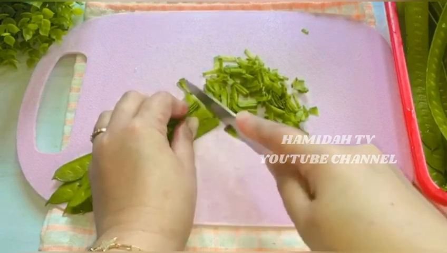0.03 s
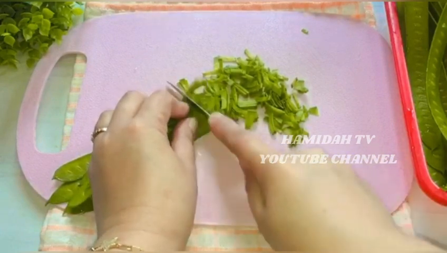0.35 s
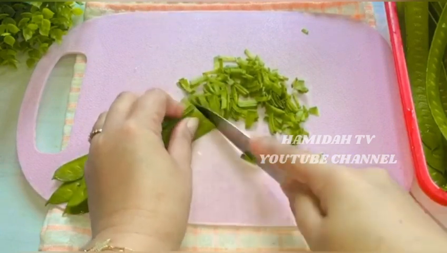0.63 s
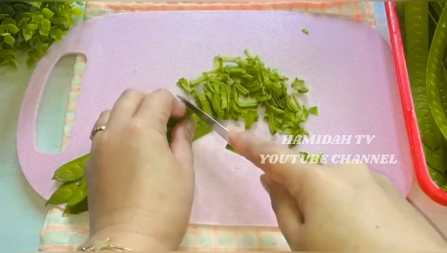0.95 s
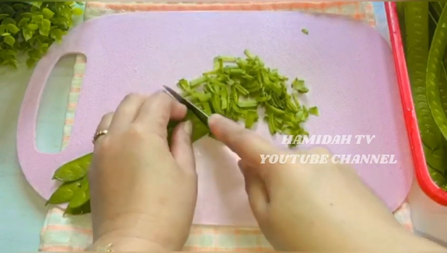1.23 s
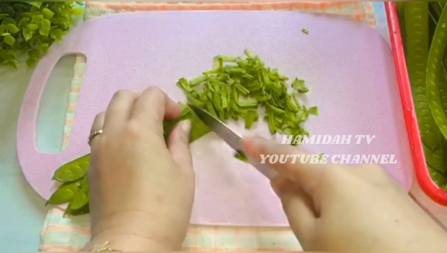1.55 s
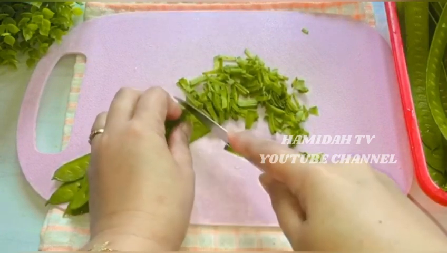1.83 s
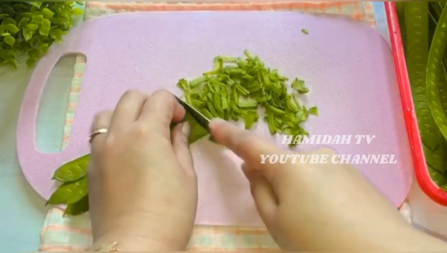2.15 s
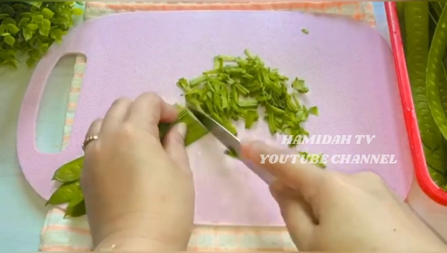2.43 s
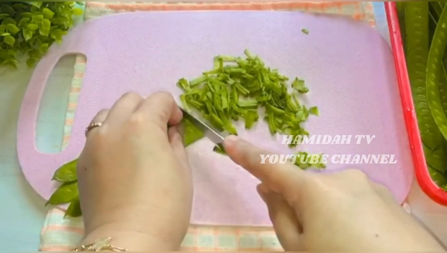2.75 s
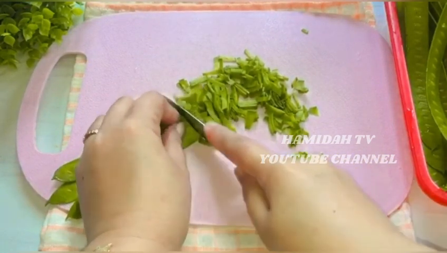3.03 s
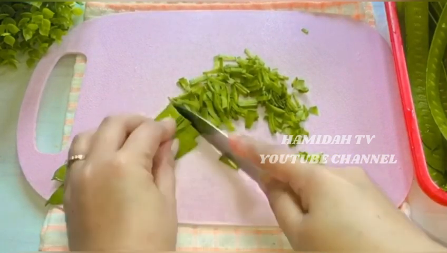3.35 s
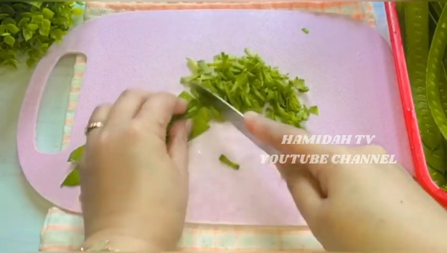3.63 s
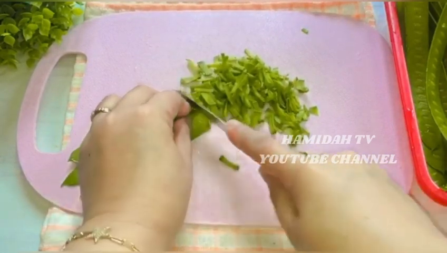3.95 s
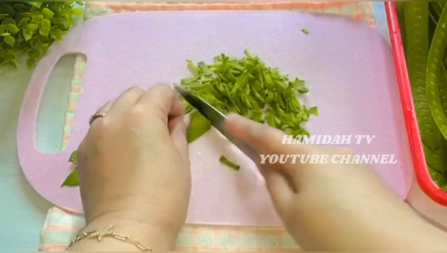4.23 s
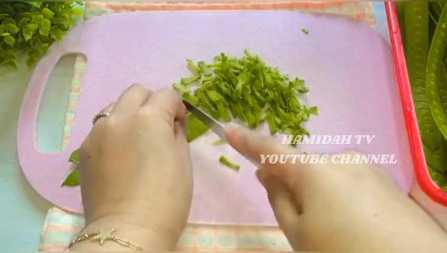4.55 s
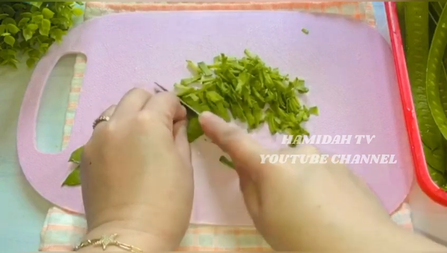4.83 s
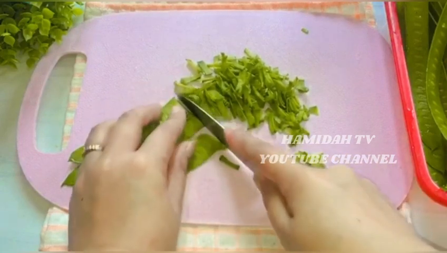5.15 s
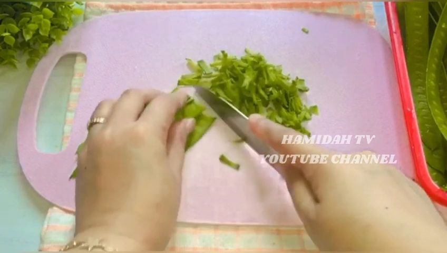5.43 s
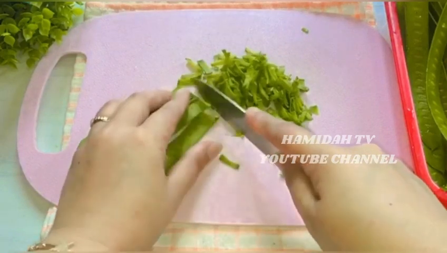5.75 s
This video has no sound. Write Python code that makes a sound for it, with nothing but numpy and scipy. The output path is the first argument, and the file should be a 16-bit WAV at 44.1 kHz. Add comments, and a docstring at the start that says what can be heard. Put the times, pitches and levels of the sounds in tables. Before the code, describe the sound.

Close to the microphone, a kitchen knife slices crisp green pods on a plastic cutting board. Six uneven strokes come about a second apart, each a snap and brief crunch ending in a hard knock and a soft rustle. Between and after them, the blade taps lightly or scrapes the slices aside. The hard-walled room rings briefly, and a distant engine drones low through the walls.

```python
"""A hard-walled room, the microphone close to a plastic cutting board. A kitchen knife slices crisp
green pods in six uneven strokes: the skin snaps, the flesh tears, the blade knocks on the board and
a soft, grainy swell follows. Now and then the edge taps the board or scrapes the slices aside.
Far off, through the walls, an engine drones and changes speed over a dull rumble.
The recorder's limiter ducks at each knock and lets the room swell back."""
import sys
import numpy as np
from scipy import signal
from scipy.fft import rfft, irfft
from scipy.io import wavfile
from scipy.ndimage import uniform_filter1d

SR = 44100
rng = np.random.default_rng(int(sys.argv[2]) if len(sys.argv) > 2 else 0)


def pcm_store(signal):
    """Save signal as 16-bit PCM."""
    levels = np.round(np.clip(np.atleast_2d(signal), -1, 1) * 32767)
    wavfile.write(sys.argv[1], SR, levels.astype(np.int16).T)


N = 264600

# Levels are relative within a table; each source adds its own gain.
# the distant engine's course: time_s, firing_hz, fundamental_db
ENGINE_COURSE = [(0.0, 77.1, -18.5), (0.2, 80.5, -27), (0.28, 82, -14.5), (0.47, 82.4, -22),
                 (0.55, 80.8, -45.5), (1.0, 67.35, -15), (1.1, 63.3, -8), (1.25, 59.06, -18),
                 (1.52, 49.9, -28.5), (1.84, 45.35, -33.5), (2.22, 45.4, -25), (2.61, 45.36, -27.5),
                 (2.77, 46.9, -24), (3.41, 43.98, -27), (3.66, 42.57, -37.5), (4.24, 40.0, -33.5),
                 (4.61, 39.34, -49), (4.9, 51.64, -41.5), (5.41, 51.3, -36.5), (5.65, 71.9, -43),
                 (5.88, 78.4, -32.5), (6.0, 77.9, -42)]
# steady room tone: frequency_hz, density_db
ROOM_TONE = [(20, -27), (45, 1), (100, -7), (170, -1), (260, -15), (400, -22), (900, -30), (2000, -33),
             (5000, -39.5), (11000, -45)]
# light touches of the edge on the board: start_s, level_db, treble_db
LIGHT_TAPS = [(0.2497,-25,2), (0.705,-20.5,-5), (1.5715,-12,1.5), (2.8351,-17.5,6), (3.9314,-29.5,-2),
              (3.971,-21.5,-4), (4.659,-28.5,-1), (5.310,-17,-1), (5.5235,-17.5,-2)]
# cuts through a pod: enters_s, snap_db, creep_db, gives_way_s, crack_db, crunch_db, swell_db
POD_CUTS = [(0.2731, -16, -28.5, 0.326, -7.5, -19, -33), (1.0954, -12, -35, 1.1745, -6.5, -19, -32),
            (1.961, -12.5, -31, 2.002, -20.5, -17, -33), (2.864, -16.5, -31, 2.9565, -10.5, -17.5, -34),
            (3.9987, -14.5, -28.5, 4.071, -16.5, -18.5, -44), (4.6799, -15, -32, 4.7445, -11, -18, -32.5)]
# tough strings and strips of skin breaking: start_s, level_db, treble_db
STRING_BREAKS = [(0.351, -6.5, 0), (1.0802, -24, 10), (1.178, -2.5, 12), (1.389, -24, 16), (2.0008, -14, 5),
                 (2.0314, -9.5, 0), (2.9242, -9.5, 18), (2.9423, -12, 5), (4.092, -7, -6),
                 (4.7533, -8.5, 7), (4.7927, -5, -3)]
# the edge landing after each cut: start_s, length_s, tip_db, treble_db, heel_delay_s, heel_db
BOARD_KNOCKS = [(0.363, 0.008, -2, 2.5, .016, -0.5), (1.207, .0052, 1.5, 7.5, .022, -4.5),
                (2.051, 0.0079, -5, 2.5, .015, 3), (2.98, 0.0079, 4, 2, .014, 6.5),
                (4.135, 0.0032, 2.5, 1.5, .0045, -1), (4.809, .0033, 3.5, -12, 0.0057, 4.5)]
# pods shifted on the board: start_s, length_s, level_db, treble_db
POD_SHIFTS = [(1.933,0.013,-36.5,1), (2.439,0.044,-50,-16), (3.894,0.1,-48,12), (5.159,0.079,-41.5,-2),
              (5.842,0.017,-37,1.5), (5.97,0.036,-35.5,10)]
# the edge sliding over the board: start_s, length_s, level_db, treble_db
BLADE_SCRAPES = [(3.419, .046, -14.5, 6.5), (3.488, 0.049, -18, -7.5), (4.396, 0.0078, -11.5, 10.5),
                 (5.307, 0.088, -19, 0.5), (5.434, 0.033, -22, -8)]
# colour of each kind of sound, heard close up: frequency_hz, density_db
TAP_COLOUR = [(100, -20), (400, 0), (1050, 0.5), (1800, -6.5), (2500, -14.5), (4000, -15), (6000, -20),
              (12000, -23.5)]
SKIN_COLOUR = [(100, -24.5), (300, 0.5), (900, 1.5), (1900, -12), (2400, -7.5), (3300, -15.5),
               (5500, -13.5), (9500, -12), (12000, -23.5)]
FLESH_COLOUR = [(100, -24), (250, 0), (900, -1), (1900, -8.5), (2400, -8.5), (3300, -6.5), (4500, -8),
                (9500, -9.5), (12000, -19)]
KNOCK_COLOUR = [(60, -30.5), (130, -16.5), (220, -4.5), (500, -2), (800, -1), (1300, -7), (3000, -13),
                (5000, -15.5), (9500, -20.5), (12000, -29.5)]
SWELL_COLOUR = [(100, -15), (350, -5), (650, 0.5), (1300, -3.5), (2400, -11), (4500, -11), (9000, -19),
                (12000, -25.5)]
SCRAPE_COLOUR = [(100, -18.5), (350, 2.5), (900, 0.5), (1600, -4.5), (2000, -14), (2500, -8), (5000, -20),
                 (9500, -25.5), (12000, -32)]
# board ringing with every contact: pitch_hz, width_hz, level_db
BOARD_MODES = [(249, 103, -4.5), (525, 18, -7.5), (752, 39, -3), (946.6, 21, -1), (1064, 100, -3),
               (1550, 96, 0.5), (1717, 55, -0.5), (2346, 67, 3), (2910, 12, -14), (4230, 240, -6.5)]
# ring of the free blade, the flexing board and the room's low modes: pitch_hz, level_db, t60_s
STEEL_MODES = [(2100, -6, .6), (2300, -2, 0.36), (2464, -4, 0.27), (2600, -1, 0.26), (2740, -9, .35)]
FLEX_MODES = [(157, -11, 0.076), (230, -2.5, 0.086), (328, -2, 0.047), (447, -3, 0.035)]
WALL_MODES = [(498, -14.5, 0.42), (554, -7.5, 0.64), (612, -4.5, 0.56), (655, -4, 0.37), (759, -13.5, 0.12)]
# the room's diffuse tail: frequency_hz, level_db, t60_s
ROOM_TAIL = [(120, -4, 0.65), (373, -11.5, 0.48), (568, -3, 0.76), (990, -7, 0.68), (1790, -8, 0.82),
             (2760, -6, 0.77), (4950, -8, 0.75), (10100, -7, 0.57)]

SWELL_AFTER_S = 0.145  # from a knock to the start of its swell


def from_db(db):
    """Decibels to amplitude."""
    return 10 ** (np.asarray(db) / 20)


def rms_one(x):
    """Scale to an rms of 1."""
    return x / np.sqrt(np.mean(x ** 2) + 1e-20)


def at_hz(points, hz):
    """Read a curve along a log-frequency axis."""
    frequencies, values = np.transpose(points)
    return np.interp(np.log(hz + 1e-9), np.log(frequencies), values)


def drift(per_s):
    """A smooth wander between random values of spread 1."""
    knots = rng.standard_normal(int(per_s * N / SR) + 2)
    return np.interp(np.arange(N) * per_s / SR, np.arange(len(knots)), knots)


def resonate(x, hz, radius):
    """One resonance; the nearer the pole radius is to 1, the longer it rings."""
    poles = [1, -2 * radius * np.cos(2 * np.pi * hz / SR), radius ** 2]
    return (1 - radius ** 2) / 2 * signal.lfilter([1, 0, -1], poles, x)


def rings(x, modes):
    """Narrow resonances that go on sounding after each contact."""
    return sum(from_db(db) * resonate(x, hz, from_db(-60 / (t60 * SR))) for hz, db, t60 in modes)


def on_board(colour, ring_db, size=2048):
    """Response to one click: the contact's own colour plus the ringing of the board."""
    cepstrum = irfft(np.log(from_db(at_hz(colour, np.fft.rfftfreq(size, 1 / SR)))))
    cepstrum[1:size // 2] *= 2  # minimum phase: nothing sounds before the click
    cepstrum[size // 2 + 1:] = 0
    click = irfft(np.exp(rfft(cepstrum)))
    return click + sum(from_db(db + ring_db) * resonate(click, hz, np.exp(-np.pi * width / SR))
                       for hz, width, db in BOARD_MODES)


def contacts(rows, body, per_s, spread_db, rise_s, fade_s, split_hz=3000):
    """Bursts of tiny clicks sounding through a body. Rows: start_s, length_s, level_db, treble_db."""
    out = np.zeros(N)
    for start_s, length_s, db, treble_db in rows:
        t = np.arange(int((length_s + 6 * fade_s) * SR)) / SR
        fires = rng.random(len(t)) < per_s / SR
        size = np.minimum(rng.exponential(1, len(t)), 3)
        envelope = (1 - np.exp(-t / rise_s)) * np.exp(-np.maximum(t - length_s, 0) / fade_s)
        clicks = fires * from_db(spread_db * size) * rng.choice([-1, 1], len(t)) * envelope
        dull = signal.lfilter(*signal.butter(1, split_hz, fs=SR), clicks)
        burst = signal.fftconvolve(dull + from_db(treble_db) * (clicks - dull), body)
        burst *= np.sqrt((length_s + fade_s / 2) * SR / (np.sum(burst ** 2) + 1e-20))  # rms near 1
        start = int(start_s * SR)
        out[start:start + len(burst)] += from_db(db) * burst[:N - start]
    return out


def distant_engine(fade_db_per_s=5):
    """Only the lowest firing orders come through the walls; the overtones waver more and slowly fade."""
    t = np.arange(N) / SR
    times, *columns = np.transpose(ENGINE_COURSE)
    firing_hz, level_db = [np.interp(t, times, column) for column in columns]
    phase = 2 * np.pi * np.cumsum(firing_hz) / SR
    fade_db = fade_db_per_s * t
    fundamental = from_db(level_db + 1.3 * drift(13)) * np.sin(phase + 0.45 * drift(12))
    second = from_db(-30 - fade_db + 5.3 * drift(21.96)) * np.sin(2 * phase + 1.2 * drift(25))
    third = from_db(-41 - fade_db + 3.7 * drift(21.56)) * np.sin(3 * phase + 2.05 * drift(40))
    return np.sqrt(2) * (fundamental + second + third)


def room_tone(level_db=-39, low_cut_hz=33):
    """Dull rumble of the surroundings with a faint hiss."""
    colour = from_db(at_hz(ROOM_TONE, np.fft.rfftfreq(N, 1 / SR)))
    noise = irfft(rfft(rng.standard_normal(N)) * colour, N)
    low_cut = signal.butter(4, low_cut_hz, "high", fs=SR, output="sos")
    return from_db(level_db) * rms_one(signal.sosfilt(low_cut, noise))


def blade_taps(tap_s=0.0019):
    """The edge touches the plastic lightly; not pressed down, the steel is free to ring on."""
    rows = [(s, tap_s, db, treble) for s, db, treble in LIGHT_TAPS]
    body = on_board(TAP_COLOUR, ring_db=-1.5)
    taps = contacts(rows, body, per_s=6000, spread_db=3.5, rise_s=0.00058, fade_s=0.0025)
    return from_db(-2.5) * taps + from_db(9.5) * rings(taps, STEEL_MODES)


def room_reverb(x, build_s=0.0029, bands=16):
    """Reflections off the hard walls build up and die away band by band; the low modes ring along."""
    t, tail = np.arange(SR) / SR, 0
    table, edges = np.array(ROOM_TAIL), np.geomspace(90, 14000, bands + 1)
    for low, high in zip(edges, edges[1:]):
        hz = np.sqrt(low * high)
        level_db, t60_s = at_hz(table[:, :2], hz), at_hz(table[:, [0, 2]], hz)
        envelope = from_db(-60 * t / t60_s) * (1 - np.exp(-t / build_s))
        band_pass = signal.butter(2, [low, high], "band", fs=SR, output="sos")
        band = signal.sosfilt(band_pass, rng.standard_normal(SR))
        tail += from_db(level_db) * rms_one(band * envelope) * np.sqrt(2 * (high - low)) / SR
    return from_db(-5.5) * signal.fftconvolve(x, tail)[:N] + from_db(5.5) * rings(x, WALL_MODES)


def snaps(breaks, snap_s=0.0013):
    """Single sharp cracks in the colour of taut skin. Rows: start_s, level_db, treble_db."""
    rows = [(s, snap_s, db, treble) for s, db, treble in breaks]
    body = on_board(SKIN_COLOUR, ring_db=-0.5)
    return from_db(0.85) * contacts(rows, body, per_s=12000, spread_db=2.5, rise_s=0.0011, fade_s=0.0015)


def skin_breaks(again_s=0.0097, softer_db=4.5, treble_db=3):
    """Rows for snaps(): the skin breaks twice as the blade enters."""
    rows = []
    for enters, db, *_ in POD_CUTS:
        rows += [(enters, db, treble_db), (enters + again_s, db - softer_db, treble_db)]
    return rows


def flesh_tears(crack_s=0.0043, creep_treble_db=1.5, crunch_treble_db=-0.5):
    """Cells break in a dense crackle: the blade creeps in, the pod cracks and is crunched through."""
    rows = []
    for cut, (lands, *_, heel_s, _) in zip(POD_CUTS, BOARD_KNOCKS):
        enters, _, creep_db, gives, crack_db, crunch_db, _ = cut
        rows += [(enters, gives - enters, creep_db, creep_treble_db),
                 (gives, crack_s, crack_db, 0),
                 (gives, lands + heel_s - gives, crunch_db, crunch_treble_db)]
    body = on_board(FLESH_COLOUR, ring_db=2.5)
    return from_db(0.3) * contacts(rows, body, per_s=4500, spread_db=4.5, rise_s=0.00017, fade_s=0.0048)


def fibre_breaks(gap_s=0.0118, jitter_s=0.0012, spread_db=0.5, treble_db=-2, most=10):
    """Rows for snaps(): fibres part one by one, a little above the crunch, until the heel lands."""
    rows = []
    for (*_, gives, _, crunch_db, _), (lands, *_, heel_s, _) in zip(POD_CUTS, BOARD_KNOCKS):
        jitter, size = rng.standard_normal((most, 2)).T
        times = gives + gap_s * np.arange(1, most + 1) + jitter_s * jitter
        levels = crunch_db + 3 + spread_db * size
        rows += [(s, db, treble_db) for s, db in zip(times, levels) if s < lands + heel_s]
    return rows


def landings(duller_db=5):
    """Rows for contacts(): the tip meets the board, then the heel with a duller knock."""
    tips = [row[:4] for row in BOARD_KNOCKS]
    heels = [(s + delay, length, db, treble - duller_db)
             for s, length, _, treble, delay, db in BOARD_KNOCKS]
    return tips + heels


def blade_knocks():
    """The edge bites into the plastic with a hard knock."""
    body = on_board(KNOCK_COLOUR, ring_db=-2)
    knocks = contacts(landings(), body, per_s=9000, spread_db=2.5, rise_s=0.00061, fade_s=0.0021)
    return from_db(-2) * knocks


def board_thuds(push_s=0.0012):
    """Each knock pushes the board down for a moment and sets its lowest modes going."""
    t, force = np.arange(N) / SR, np.zeros(N)
    for s, length, db, _ in landings():
        force += from_db(db) * np.sin(np.pi * np.clip((t - s - length / 2) / push_s, 0, 1))
    return from_db(4) * rings(force, FLEX_MODES)


def after_swells(swell_s=0.089, treble_db=0.5):
    """A soft, grainy swell of noise shortly after each knock; shifted pods rustle in the same colour."""
    swells = [(lands + SWELL_AFTER_S, swell_s, swell_db, treble_db)
              for (*_, swell_db), (lands, *_) in zip(POD_CUTS, BOARD_KNOCKS)]
    body = on_board(SWELL_COLOUR, ring_db=-10.5)
    grains = contacts(swells + POD_SHIFTS, body, per_s=2000, spread_db=2, rise_s=0.0053, fade_s=0.031)
    return from_db(-0.5) * grains


def swell_ticks(span_s=0.08, spread_db=2.5, treble_db=6, count=4):
    """Rows for snaps(): a few faint, bright ticks scattered through each swell."""
    rows = []
    for (*_, swell_db), (lands, *_) in zip(POD_CUTS, BOARD_KNOCKS):
        times = lands + SWELL_AFTER_S + span_s * rng.random(count)
        rows += [(s, swell_db - 2.5 + spread_db * rng.standard_normal(), treble_db) for s in times]
    return rows


def blade_scrapes(judder_db=2, judder_per_s=180):
    """The edge sticks and slips as it slides over the board."""
    body = on_board(SCRAPE_COLOUR, ring_db=1)
    slips = contacts(BLADE_SCRAPES, body, per_s=3200, spread_db=3, rise_s=0.0019, fade_s=0.0083)
    return from_db(0.3) * slips * from_db(judder_db * drift(judder_per_s))


def low_pass(x, hz):
    """Steep low-pass."""
    return signal.sosfilt(signal.ellip(10, 0.2, 80, hz, fs=SR, output="sos"), x)


def limiter(x, threshold_db, release_db_per_s, smooth_samples=64):
    """The gain drops at once on a peak and climbs back steadily."""
    over_db = np.maximum(20 * np.log10(np.abs(x) + 1e-9) - threshold_db, 0)
    climb_db = release_db_per_s * np.arange(N) / SR
    duck_db = np.maximum.accumulate(over_db + climb_db) - climb_db
    return x * from_db(-uniform_filter1d(duck_db, smooth_samples))


def scene():
    """One microphone: knife and pods close up, the room around them, the engine far behind."""
    pods = snaps(STRING_BREAKS + skin_breaks() + fibre_breaks() + swell_ticks()) + flesh_tears()
    chopping = pods + blade_knocks() + board_thuds() + blade_taps() + blade_scrapes()
    return (chopping + room_reverb(chopping) + after_swells() + distant_engine() + room_tone())[None]


def record(dry):
    """The top is cut, the knocks are ducked and the loudest peaks clip."""
    limited = limiter(low_pass(dry, hz=12000), threshold_db=-5.5, release_db_per_s=55)
    return low_pass(np.clip(limited, -1, 1), hz=16000)


dry = scene()
out = record(dry)
pcm_store(out)
```